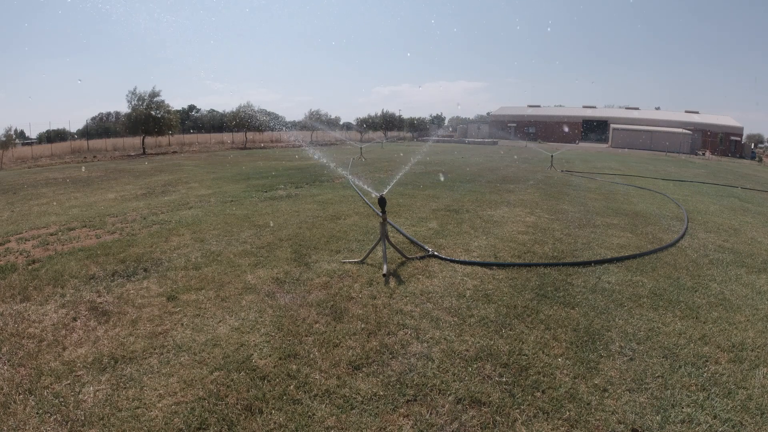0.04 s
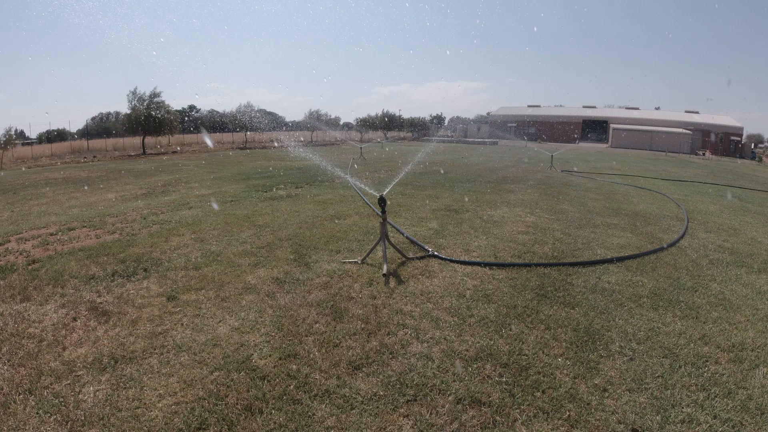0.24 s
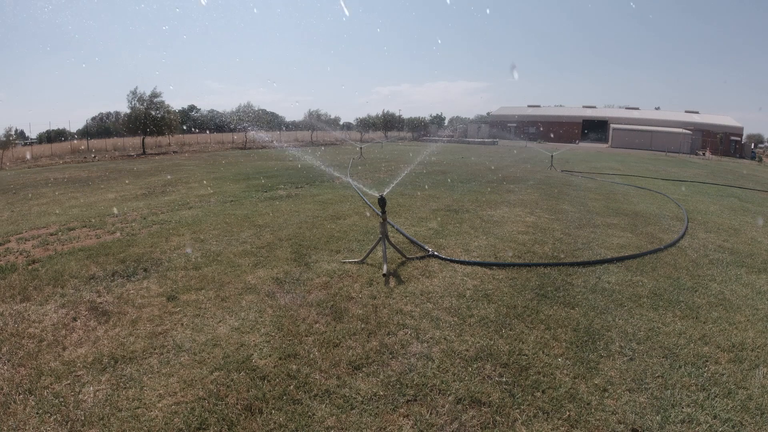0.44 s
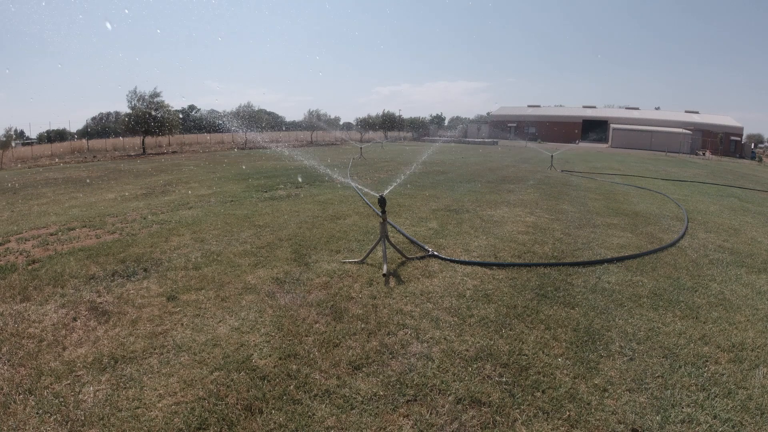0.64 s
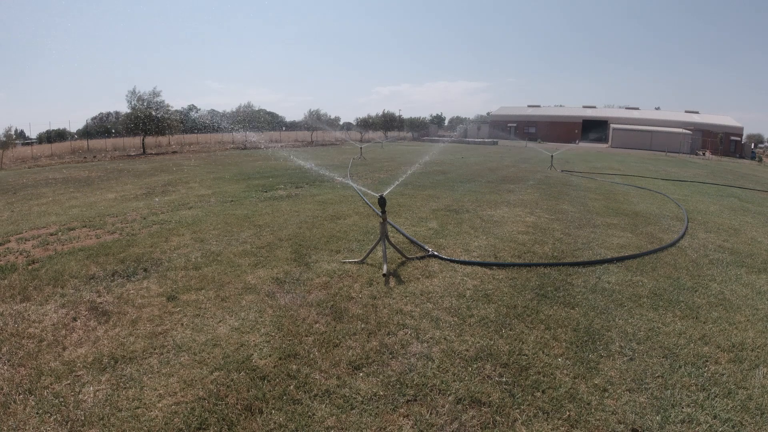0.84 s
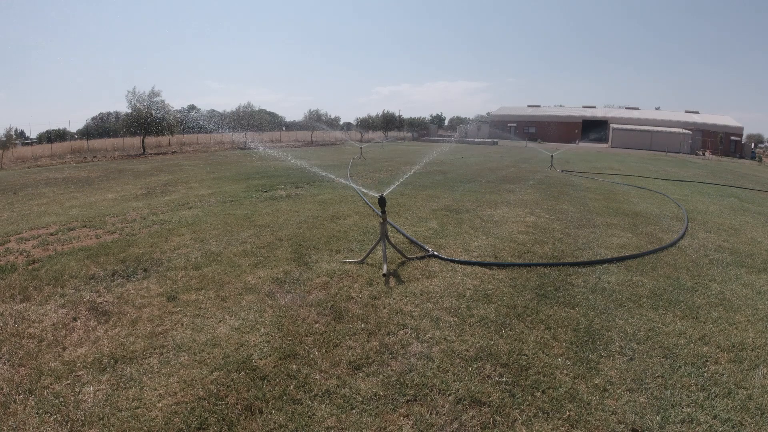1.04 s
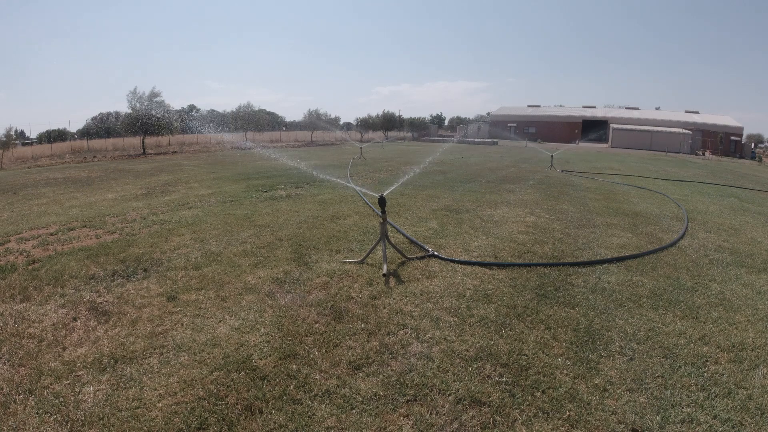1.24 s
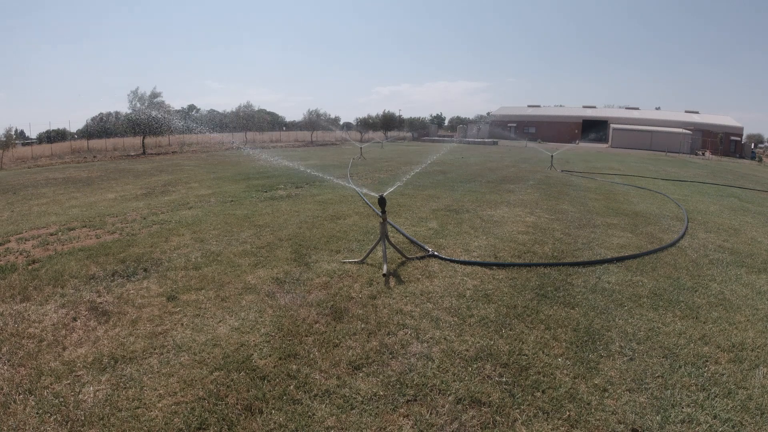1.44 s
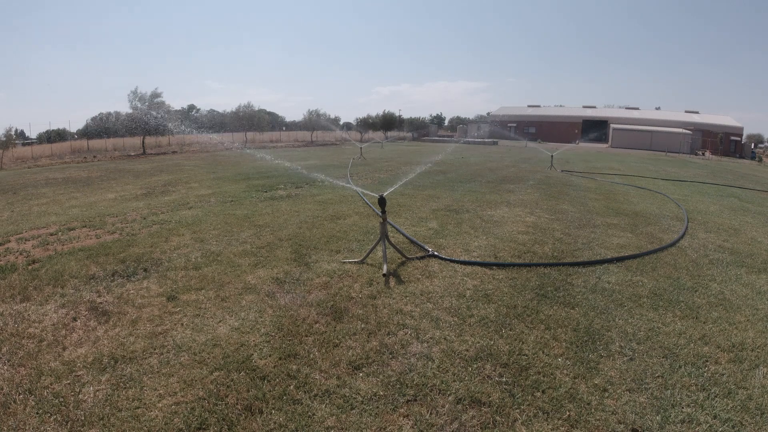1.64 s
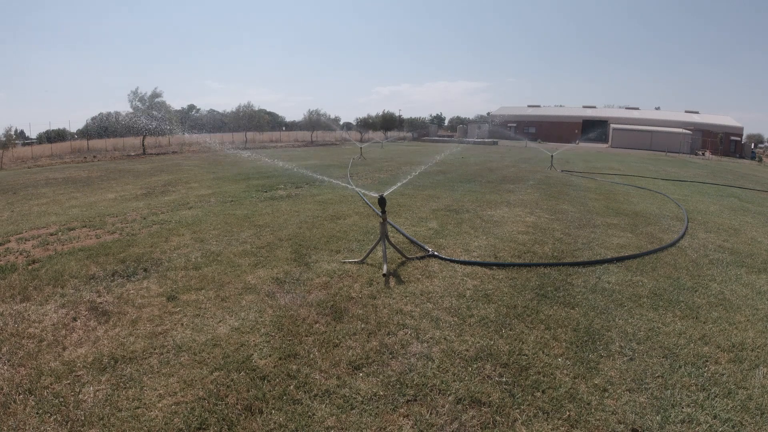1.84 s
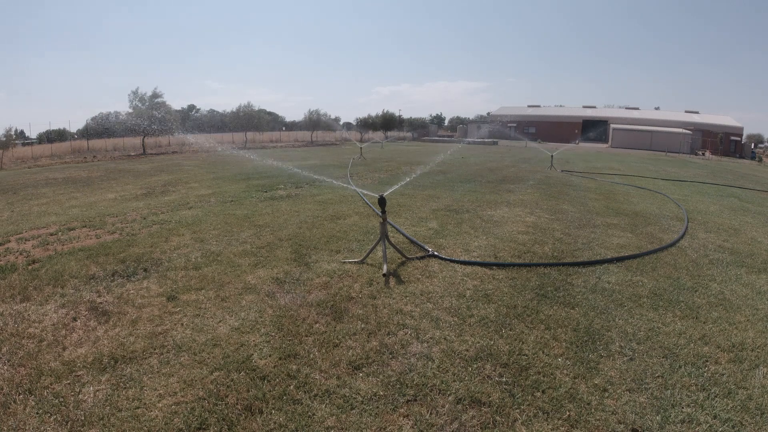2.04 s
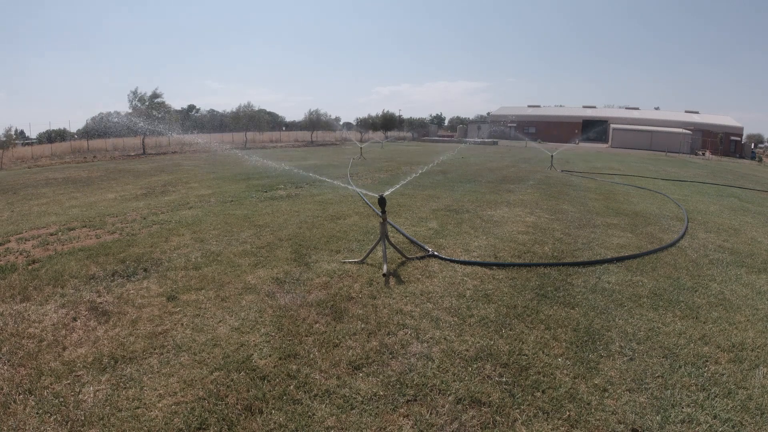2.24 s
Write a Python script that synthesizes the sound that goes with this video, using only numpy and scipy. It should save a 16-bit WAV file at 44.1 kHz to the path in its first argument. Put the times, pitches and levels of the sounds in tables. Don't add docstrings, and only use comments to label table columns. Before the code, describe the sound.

Impact sprinkler hisses and ticks rapidly over a lawn, drops pelting the microphone amid buffeting wind

```python
import sys
import numpy as np
from scipy import signal
from scipy.fft import rfft, irfft, next_fast_len
from scipy.io import wavfile
from scipy.ndimage import uniform_filter1d, map_coordinates

SR = 44100
rng = np.random.default_rng(int(sys.argv[2]) if len(sys.argv) > 2 else 0)


def amplitude_ratio(level_db):
    exponent = np.asarray(level_db, float) / 20
    return 10 ** exponent


def to_wav(sig):
    pcm = np.clip(np.atleast_2d(sig), -1, 1) * 32767
    pcm = np.round(pcm).astype(np.int16)
    wavfile.write(sys.argv[1], SR, pcm.T)


N = 101429

# f/Hz, likeness (1 = the same)
LIKENESS = [(1000, 0.77), (3000, 0.18), (7000, 0.68), (15000, 0.55)]


def unit(x):
    return x / np.sqrt(np.mean(x ** 2) + 1e-20)


def along(points, hz):
    f, v = np.transpose(points)
    return np.interp(np.log(hz + 1), np.log(f + 1), v, left=-120, right=-120)


def wobble(rate):
    knots = rng.standard_normal(int(N * rate / SR) + 4)
    return map_coordinates(knots, [np.arange(N) * rate / SR])


def lumps(db, rate):
    return amplitude_ratio(db * np.array([wobble(rate), wobble(rate)]))


def filtered(x, response):
    m = next_fast_len(N + SR // 2)
    return irfft(rfft(x, m) * response(np.fft.rfftfreq(m, 1 / SR)), m)[..., :N]


def pair(alike):
    def mix(hz):
        turn = np.arccos(np.clip(alike(hz), -1, 1)) / 2
        return np.array([np.cos(turn), np.sin(turn)])
    mid, side = filtered(rng.standard_normal((2, N)), mix)
    return np.array([mid + side, mid - side])


def even_pair(likeness):
    return pair(lambda hz: likeness + 0 * hz)


def steady_pair():
    f, likeness = np.transpose(LIKENESS)
    return pair(lambda hz: np.interp(np.log(hz + 1), np.log(f), likeness))


def coloured(x, spectrum):
    return unit(filtered(x, lambda hz: amplitude_ratio(along(spectrum, hz))))


def add(track, s, sound):
    part = track[..., round(s * SR):][..., :sound.shape[-1]]
    part += sound[..., :part.shape[-1]]


def bursts(rows):
    t = np.arange(N) / SR
    power = 0
    for s, half_s, *db in rows:
        power = power + amplitude_ratio(np.array(db)[:, None]) ** 2 * np.exp(-((t - s) / half_s) ** 2)
    return np.sqrt(power)


def distant_hum():
    # f/Hz, level/dB per Hz
    hum_band = [(100, -11.5), (200, 0), (350, -24), (700, -25), (1200, -36.5)]
    return amplitude_ratio(-54.5) * coloured(steady_pair(), hum_band)


def bird():
    # t/s, length/s, f/Hz, level/dB
    whistles = [
        (.642, .035, 4930, -78),
        (.755, .1, 2930, -76),
        (1.8, .045, 4930, -82),
        (1.89, .145, 2900, -79.5),
    ]
    sag = .02
    out, flutter = np.zeros(N), amplitude_ratio(2.2 * wobble(50.7))
    for s, length, hz, db in whistles:
        u = np.arange(round(length * SR)) / SR / length
        swell = np.sin(np.pi * u) ** .4
        add(out, s, amplitude_ratio(db) * swell * np.sin(2 * np.pi * hz * length * (u - sag * u ** 2 / 2)))
    out = out * amplitude_ratio(2.2 * wobble(160))
    return out * flutter * amplitude_ratio([[-2], [1.5]])


def buffeting():
    # centre t/s, half length/s, level/dB
    swells = [(.09, 0.045, -37), (.18, 0.036, -23), (.33, 0.06, -21), (.5, 0.079, -25), (.675, 0.026, -27),
              (.79, 0.25, -38.5), (1.2, 0.058, -35.5), (1.36, 0.072, -23), (1.55, 0.067, -50),
              (1.72, 0.085, -34.5), (1.92, 0.047, -47)]
    # f/Hz, level/dB per Hz
    rumble_band = [(10, -8.5), (25, 5), (60, 2.5), (130, -1.5), (250, -18.5), (500, -28.5), (1000, -99)]
    calm_db = -44.5
    rumble = unit(lumps(0.85, 15.33) * coloured(even_pair(0), rumble_band))
    return np.hypot(bursts(swells), amplitude_ratio(calm_db)) * amplitude_ratio(-1.0) * rumble


def gusts():
    # centre t/s, half length/s, level/dB, fall-off/dB per kHz
    gust_rows = [(0.266, 0.03, -23.5, 46), (0.306, 0.019, -25.5, 19), (0.363, 0.028, -26, 29),
                 (0.38, 0.0065, -27.5, 11.5), (0.399, 0.0078, -22, 20), (0.43, 0.033, -34.5, 31.5),
                 (0.482, 0.0062, -30, 21.5), (0.518, 0.024, -32.5, 44.5), (0.673, 0.032, -32, 55.5),
                 (1.07, 0.076, -41, 91), (1.186, .04, -35, 40), (1.241, 0.019, -23.5, 44),
                 (1.288, 0.027, -24, 43), (1.336, 0.015, -21.5, 42), (1.403, 0.051, -24.5, 56.5),
                 (1.453, 0.017, -27, 38), (1.563, 0.029, -32, 46), (1.628, 0.0097, -36, 27),
                 (1.687, 0.029, -29.5, 25), (1.731, 0.021, -23.5, 48.5), (1.848, 0.016, -33.5, 48.5),
                 (1.899, 0.017, -30, 39), (1.82, 0.017, -35.5, 62), (1.973, 0.029, -31.5, 41.5),
                 (2.058, 0.02, -36, 55), (2.2, 0.42, -42, 57.5)]
    low_hz, tail_db = 118, -54
    noise = pair(lambda hz: 0.6 * hz / (hz + 300))
    hz, t, z = signal.stft(noise, SR, nperseg=512, noverlap=384)
    hz, power = hz[:, None], 0
    for s, half_s, db, fall_db in gust_rows:
        corner_hz = low_hz * (40 / fall_db) ** 1.22
        tilt = amplitude_ratio(-fall_db * hz / 1000) + amplitude_ratio(tail_db - 6 * hz / 1000)
        tilt = tilt * hz ** 2 / (hz ** 2 + corner_hz ** 2)
        power = power + (amplitude_ratio(db - 1.5) * unit(tilt)) ** 2 * np.exp(-((t - s) / half_s) ** 2)
    patches = uniform_filter1d(rng.standard_normal(z.shape[1:]), size=4, axis=0)
    patches = unit(uniform_filter1d(patches, size=5, axis=1))
    z = z * amplitude_ratio(2.15 * patches) * np.sqrt(power)
    roar = signal.istft(z, SR, nperseg=512, noverlap=384)[1][:, :N]
    return roar * lumps(2, 70) * amplitude_ratio(0.71 * wobble(140))


def thumps():
    # centre t/s, peak level/dB, f/Hz, number of cycles
    eddies = [(.21, -19, 90, 1.14), (0.396, -20, 560, 0.78), (.402, -9.5, 280, 0.97), (.483, -25, 696, 2.2),
              (.668, -23, 131, 0.55), (.674, -28, 567, 1.3), (1.236, -13.5, 329, 0.83),
              (1.29, -14.5, 139, 1.2), (1.332, -18, 400, 2.1), (1.45, -20, 296, 1.1),
              (1.624, -34, 350, 0.98), (1.671, -27.5, 600, 4), (1.688, -24.5, 600, 2.2),
              (1.78, -34.5, 225, 3.4), (1.85, -36.5, 600, 4), (1.968, -37, 285, 2.3),
              (2.045, -32.5, 248, 2.1)]
    out, t = np.zeros((2, N)), np.arange(-SR // 25, SR // 25) / SR
    opposite = np.array([[1], [-1]])
    luck = rng.standard_normal((len(eddies), 2))
    for (s, db, hz, cycles), (side, turn) in zip(eddies, luck):
        shape = np.exp(-(2 * t * hz / cycles) ** 2)
        wave = -np.sin(2 * np.pi * hz * t + 0.49 * turn * opposite)
        add(out, s + t[0], amplitude_ratio(db + 1.5 * side * opposite) * shape * wave)
    return out


def patter():
    # centre t/s, half length/s, wet level/dB, mist level/dB
    patter_rows = [(.03, 0.081, -47.5, -70), (.17, 0.022, -38, -87), (.245, 0.031, -46, -54),
                   (.31, 0.021, -71, -76), (.38, 0.056, -44.5, -60), (.46, 0.016, -40.5, -51),
                   (.535, 0.034, -44, -60), (.6, 0.035, -44.5, -60), (.68, 0.22, -61.5, -70)]
    # centre t/s, half length/s, level/dB
    fine_rows = [(0.49, 0.08, -70.5)]
    # f/Hz, level/dB per Hz
    wet_band = [(600, -0.5), (1100, 0), (2300, 1), (3300, -4.5), (5000, -14.5), (7000, -24)]
    mist_band = [(6500, -40), (8300, -4), (9200, 5), (10500, -24), (12500, -31)]
    fine_band = [(9200, -27), (10400, -13), (11800, -33)]
    hits_per_s, spread_db, grain_t60_s = 320, 2.6, .006
    wet, mist = bursts(patter_rows)
    hits = (rng.random(N) < hits_per_s / SR) * amplitude_ratio(spread_db * rng.exponential(size=N))
    fade = amplitude_ratio(-60 * np.arange(512) / SR / grain_t60_s)
    grains = signal.fftconvolve(hits, fade)[:N] + 1.2
    wet = wet * coloured(grains * even_pair(0.054), wet_band) * amplitude_ratio(-8)
    fine = bursts(fine_rows) * coloured(even_pair(.5), fine_band)
    return wet + fine + mist * coloured(even_pair(.5), mist_band) * amplitude_ratio(-12 + 2.5 * wobble(61.0))


def drops():
    # t/s, peak level/dB, f/Hz, second f/Hz,
    # splash level above 6 kHz/dB
    drop_rows = [(0.0074, -33, 2320, 2770, -62), (0.0348, -41, 2440, 2770, -69),
                 (0.046, -36.5, 2140, 2730, -79), (0.0564, -42, 3870, 2420, -73),
                 (0.0964, -37, 2190, 1710, -68), (0.1467, -19, 2470, 1500, -77),
                 (0.17, -32, 3770, 2130, -74), (0.1765, -18.5, 3240, 3930, -56),
                 (0.1974, -41, 3040, 4100, -58), (0.2229, -44, 2320, 4300, -58),
                 (0.2806, -34.5, 2840, 1540, -77), (0.32, -35, 1840, 2630, -62),
                 (0.3625, -36.5, 2300, 3600, -74), (0.378, -24.5, 1990, 1400, -55.5),
                 (0.4006, -36, 2400, 3950, -55), (0.4165, -45, 3170, 2900, -75),
                 (0.4487, -23, 2380, 1840, -44.5), (0.451, -33, 3100, 3200, -75),
                 (0.4625, -45, 2500, 1690, -57), (0.469, -50, 2700, 3300, -75),
                 (0.515, -37.5, 1870, 2780, -48.5), (0.5255, -33, 1920, 2300, -72),
                 (0.53, -36, 3200, 2300, -72), (0.549, -21.5, 2500, 3030, -50),
                 (0.565, -46, 2300, 2800, -70), (0.582, -26.5, 2750, 2390, -64),
                 (0.5928, -37, 2500, 2600, -69), (0.602, -20.5, 2600, 2110, -61),
                 (0.6148, -30.5, 2160, 2880, -51.5), (0.631, -45, 2100, 1800, -70),
                 (0.7551, -47, 2420, 2590, -71), (0.789, -51.5, 2880, 3320, -73.5),
                 (1.356, -52, 2510, 2310, -81), (1.566, -57, 4000, 4220, -80),
                 (2.0448, -50.5, 5050, 3430, -69)]
    # t/s, peak level/dB
    ring_rows = [(0.096, -26), (0.131, -31), (0.146, -25.5), (0.169, -7), (0.253, -18.5), (0.451, -9),
                 (0.524, -28), (0.555, -27.5), (0.582, -14.5), (0.602, -26.5), (0.616, -28)]
    # f/Hz, level/dB, time to fade by 60 dB/s
    case_tones = [(925, -13.5, 0.049), (1040, -34, 0.008)]
    tick_t60_s, splash_t60_s, rise_s, lag_s = .0043, 0.0078, 0.00053, .00008
    out, t = np.zeros((2, N)), np.arange(SR // 8) / SR
    splash, luck = np.zeros((2, N)), rng.standard_normal((len(drop_rows), 4))
    for (s, db, hz, second_hz, splash_db), r in zip(drop_rows, luck):
        tick = np.sin(2 * np.pi * hz * t) + amplitude_ratio(-3) * np.sin(2 * np.pi * second_hz * t + r[0])
        tick = tick * (1 - np.exp(-t / rise_s)) ** 2
        add(out, s, amplitude_ratio(db + 11.5 - 60 * t / tick_t60_s) * tick * amplitude_ratio([[r[2]], [-r[2]]]))
        add(splash, s, amplitude_ratio(splash_db + 4 - 60 * t / splash_t60_s) * amplitude_ratio([[1.5], [-1.5]]))
    ring = np.zeros(N)
    for s, db in ring_rows:
        tones = sum(amplitude_ratio(db + g - 60 * t / t60) * np.sin(2 * np.pi * hz * t) for hz, g, t60 in case_tones)
        add(ring, s, tones * (1 - np.exp(-t / rise_s)))
    out = out + ring * amplitude_ratio(0.38 * np.array([wobble(157.5), wobble(145.6)]))
    out = filtered(out, lambda hz: np.exp(np.outer([1j, -1j], np.pi * hz * lag_s)))
    bright = [(3000, -10), (4800, -18), (9000, 20), (12000, -2), (16000, -7)]  # f/Hz, level/dB
    return out + splash * coloured(even_pair(0.29), bright)


def cracks():
    # t/s, peak level/dB
    crack_rows = [(0.1707, -36.5), (0.176, -32.5), (.381, -46.5), (0.4028, -43), (0.45, -49),
                  (0.549, -53.5), (0.6032, -41), (0.618, -46)]
    # f/Hz, level/dB per Hz
    crack_band = [(2500, -1), (4000, 1), (6000, -7), (7500, -31), (11000, -24), (15000, -22.5),
                  (16800, -23)]
    snap_s = 0.00062
    t = np.arange(N) / SR
    snap = sum(amplitude_ratio(db) * np.exp(-np.abs(t - s) / snap_s) for s, db in crack_rows)
    return snap * coloured(even_pair(0.25), crack_band)


def sprinkler():
    # t/s, peak level/dB
    hard_blows = [(0.919, -58), (1.0498, -59), (1.3548, -57.5), (1.442, -56.5), (1.504, -51.5),
                  (1.5681, -56), (1.682, -58), (1.797, -61), (2.0253, -64), (2.045, -58), (2.2572, -56)]
    # f/Hz, level/dB per Hz
    jet_band = [(530, -43), (900, -1), (2100, -5), (5000, -10.5), (7300, -18.5), (9100, -7.5),
                (12300, -15.5), (14300, -11), (16500, -14)]
    # f/Hz, level/dB
    arm_band = [(500, -25), (1800, 1), (3000, -2.5), (4600, -10.5), (7200, -14), (9000, -11.5),
                (13000, -38)]
    start_s, period_s, jitter_s = .0115, .05754, 0.00022
    arm_db, scatter_db, tick_t60_s = -62.5, 1.5, 0.011
    jet_db, slap_db, slap_s = -65.5, 2, 0.005
    luck = rng.standard_normal((int(N / SR / period_s), 2))
    t = np.arange(SR // 20) / SR
    tick, slap = np.zeros(N), np.zeros(N)
    for k, (late, size) in enumerate(luck):
        s = start_s + k * period_s + jitter_s * late
        add(tick, s, amplitude_ratio(arm_db + scatter_db * size - 60 * t / tick_t60_s))
        add(slap, s, t / slap_s * np.exp(1 - t / slap_s))
    for s, db in hard_blows:
        add(tick, s, amplitude_ratio(db - 2 - 60 * t / tick_t60_s))
    hiss = coloured(steady_pair(), jet_band) * amplitude_ratio(jet_db + slap_db * (slap - 2.5) + 1.56 * wobble(90))
    return hiss + tick * coloured(even_pair(0.87), arm_band)


def scene():
    background = distant_hum() + bird()
    wind = buffeting() + gusts() + thumps()
    spray = patter() + drops() + cracks()
    return background + wind + spray + sprinkler()


def dull_moments(x):
    # centre t/s, half length/s, highest f kept/Hz
    dull_rows = [(.018, .005, 12600), (.048, .011, 13200), (.09, .033, 15100), (.156, .012, 12400),
                 (.192, .01, 15200), (.28, .008, 14000), (.438, .005, 13500), (.475, .017, 15200),
                 (.535, .005, 14000), (.575, .016, 12400), (.6, .008, 15000), (.64, .018, 14800),
                 (.675, .02, 13000), (.715, .02, 15300), (1.21, .01, 14300), (1.3, .01, 14000),
                 (1.445, .008, 13500), (1.66, .011, 13200), (1.94, .008, 14500)]
    hz, t, z = signal.stft(x, SR, nperseg=256)
    lost = sum((hz[:, None] > top) * (np.abs(t - s) < half_s) for s, half_s, top in dull_rows) > 0
    return signal.istft(z * np.where(lost, amplitude_ratio(-22), 1), SR, nperseg=256)[1][:, :N]


def band_limit(x):
    return signal.sosfilt(signal.butter(12, 16480, fs=SR, output="sos"), x)


def record(dry):
    x = filtered(dull_moments(dry), lambda hz: np.where(hz < 15800, 1, amplitude_ratio(-26)))
    mix = .5 * np.tanh(2 * x)
    return band_limit(mix)


dry = scene()
out = record(dry)
to_wav(out)
```